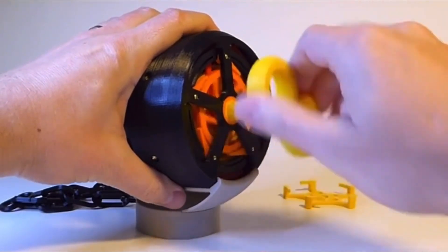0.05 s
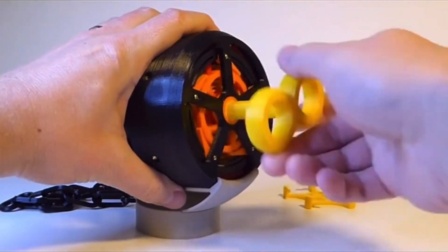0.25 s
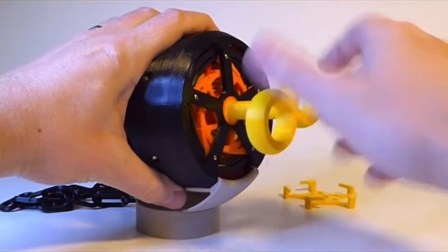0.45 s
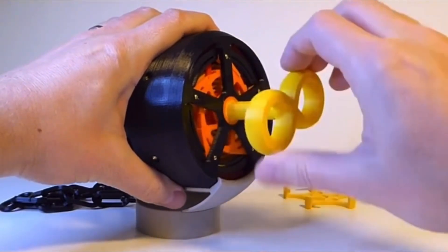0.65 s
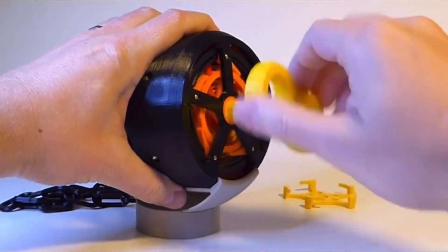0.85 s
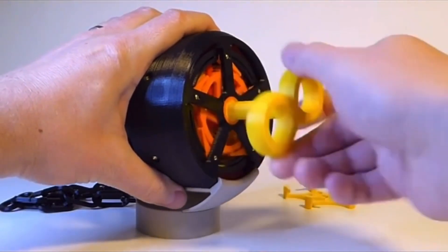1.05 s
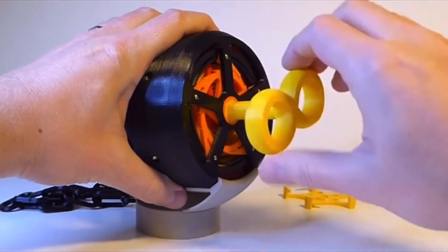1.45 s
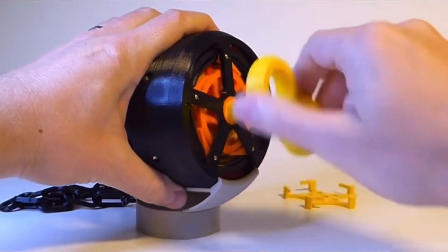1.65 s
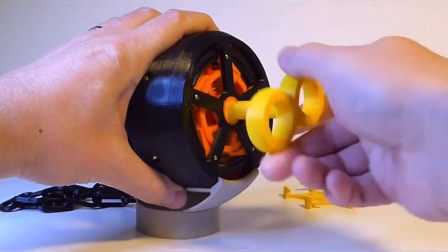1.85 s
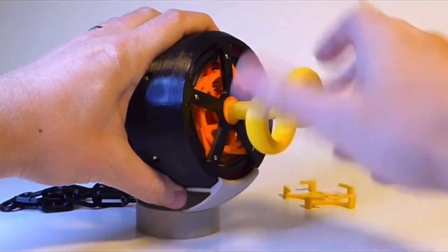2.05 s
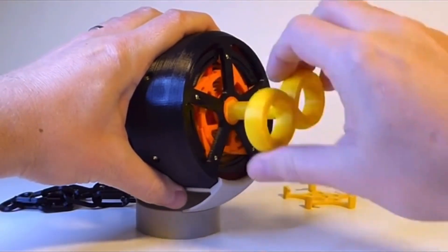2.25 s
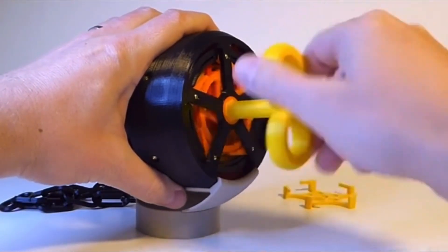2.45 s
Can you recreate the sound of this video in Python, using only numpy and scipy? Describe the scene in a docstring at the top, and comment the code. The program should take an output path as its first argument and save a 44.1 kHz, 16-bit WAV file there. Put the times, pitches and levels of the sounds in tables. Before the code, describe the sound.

Close ratchet clicking comes in three bursts as a big key winds a plastic ball. Each turn scrapes briefly, snaps and clatters. The loose key knocks between turns, over room echo and a faint low rumble.

```python
"""A plastic clockwork ball, wound by hand with a big key: three turns in a reverberant room.
On each turn the key rubs until its slack is taken up and catches with a loud snap; then the gears
tick and the pawl clatters over nine teeth, ringing the shell. Mostly between turns, the hand bumps
the toy and the loose key knocks in its socket. Room air and a low, swelling rumble lie underneath."""
import sys
import numpy as np
from scipy import signal
from scipy.fft import rfft, irfft, next_fast_len
from scipy.io import wavfile

SR = 44100
rng = np.random.default_rng(int(sys.argv[2]) if len(sys.argv) > 2 else 0)


def master_out(mix):
    """Clip the mix to full scale and print it as 16-bit PCM to the path in sys.argv[1]."""
    frames = np.transpose(np.atleast_2d(mix))
    ceiling = np.clip(frames, -1, 1)
    pcm = np.round(ceiling * 32767).astype(np.int16)
    wavfile.write(sys.argv[1], SR, pcm)


N = 110250


def from_db(db):
    return 10 ** (np.asarray(db) / 20)


def unit(x):
    """Scale to energy 1."""
    return x / np.sqrt(np.sum(x ** 2) + 1e-20)


def at_hz(points, hz):
    """Read a table on a log-frequency axis."""
    freqs, values = np.transpose(points)
    return np.interp(np.log(np.maximum(hz, 1)), np.log(freqs), values)


def colour(x, points):
    """Minimum-phase filter following (Hz, dB) points."""
    n = 2 * next_fast_len(x.shape[-1])
    gain = from_db(at_hz(points, np.fft.rfftfreq(n, 1 / SR)))
    cepstrum = irfft(np.log(gain))
    cepstrum[1:n // 2] *= 2
    cepstrum[n // 2 + 1:] = 0
    return irfft(rfft(x, n) * np.exp(rfft(cepstrum)))[..., :x.shape[-1]]


def resonate(force, hz, width_hz):
    """One resonance, peak gain 1."""
    r = np.exp(-np.pi * width_hz / SR)
    feedback = [1, -2 * r * np.cos(2 * np.pi * hz / SR), r * r]
    return signal.lfilter(np.array([1, 0, -1]) * (1 - r * r) / 2, feedback, force)


def add(out, start_s, sound):
    """Mix a sound in at start_s."""
    i = max(int(start_s * SR), 0)
    out[i:i + len(sound)] += sound[:max(len(out) - i, 0)]


def steady(spectrum):
    """Coloured noise, rms 1."""
    return np.sqrt(N) * unit(colour(rng.standard_normal(N + SR), spectrum)[SR:])


def grains(size, spread_db):
    """Dense micro-impacts of uneven strength."""
    return rng.standard_normal(size) * from_db(spread_db * np.minimum(rng.exponential(1, size), 4))


# Stereo width of the room. Each row: frequency in Hz, side against mid in dB.
SIDE_COLOUR = [(140, -13), (600, -4), (1100, -8), (2300, -19), (3800, -16), (5000, -5), (9000, -6)]

def side(sound):
    """Diffuse sound, opposite in sign left and right."""
    return colour(sound, SIDE_COLOUR) * np.array([[1], [-1]])


# Air spectrum. Each row: frequency in Hz, relative level in dB.
AIR_COLOUR = [(70, -22), (110, -8), (200, -9), (300, -3), (500, -3.5), (650, -14.5), (950, -2), (2000, -40),
              (11000, -24.5), (13500, -43)]

def room_air():
    """Steady, diffuse air noise."""
    return from_db(-49) * (steady(AIR_COLOUR) + side(steady(AIR_COLOUR)))


# Rumble spectrum. Each row: frequency in Hz, relative level in dB.
RUMBLE_COLOUR = [(95, -15), (133, 7.5), (153, 8), (185, -18.5), (300, -2.5), (1000, -65)]
# Rumble swells. Each row: start in seconds, end in seconds, level in dB.
RUMBLE_SWELLS = [(0.66, 0.817, -44), (1.43, 1.516, -49), (1.755, 1.764, -44), (2.236, 2.41, -49)]

def rumble(floor_db=-56.5, edge_s=0.028):
    """A low rumble that swells once the hand lets go."""
    t = np.arange(N) / SR
    swells = sum(from_db(db) * np.exp(-abs(t - np.clip(t, start_s, end_s)) / edge_s)
                 for start_s, end_s, db in RUMBLE_SWELLS)
    return np.hypot(from_db(floor_db), swells) * steady(RUMBLE_COLOUR)


# Hand on key and shell. Each row: start in seconds, thud level in dB, tap level in dB.
HAND_BUMPS = [(0.094, -49, -48.5), (.612, -42.5, -37), (1.411, -48, -39), (1.756, -43, -51),
              (2.208, -42.5, -40.5), (2.455, -49, -43)]
# Thud spectrum. Each row: frequency in Hz, relative level in dB.
THUD_COLOUR = [(40, -43), (140, 0), (220, 4.5), (480, 12), (700, -32)]

def hand_bumps(decay_s=0.022):
    """Soft, quickly damped thuds, each with a hollow tap of the shell."""
    out, t = np.zeros(N), np.arange(SR // 10) / SR
    for start_s, thud_db, tap_db in HAND_BUMPS:
        force = rng.standard_normal(len(t)) * np.exp(-t / decay_s)
        thud = from_db(thud_db) * unit(colour(force, THUD_COLOUR))
        tap = from_db(tap_db) * unit(resonate(force, hz=1035, width_hz=190))
        add(out, start_s, np.sqrt(decay_s * SR) * (thud + tap))
    return out


# Bare plastic contact. Each row: frequency in Hz, gain in dB.
CONTACT_COLOUR = [(100, -41), (450, -42.5), (650, -14), (1050, -3.5), (2000, -3.5), (5000, 9.5), (7500, 2),
                  (11000, 1.5), (12500, -5), (13700, -21)]
# Shell resonances. Each row: frequency in Hz, width in Hz, relative gain in dB.
SHELL_MODES = [(1010, 140, -20), (1370, 330, -0.5), (2122, 425, 5.5), (2976, 220, 3), (3760, 190, 3),
               (4950, 200, -16), (6940, 57, -11), (8810, 440, 4)]

def body(force, modes=SHELL_MODES, ring_db=-1):
    """A plastic contact plus the resonances it excites."""
    ringing = sum(from_db(db + ring_db) * resonate(force, hz, width_hz) for hz, width_hz, db in modes)
    return colour(force + ringing, CONTACT_COLOUR)


def stray_rings(force, count=4, low_hz=2800, high_hz=11500, q=48, gain_db=11):
    """Small parts ring across the treble, differently on each click."""
    pitches = low_hz * (high_hz / low_hz) ** ((np.arange(count) + rng.random(count)) / count)
    return from_db(gain_db) * sum(resonate(force, hz, hz / q) for hz in pitches)


def click_force(t, slide_s, rattle_s, snap_share=0.06, low_linger=1.91):
    """Low, mid and high band force: a slide, a snap at t = 0, a dying rattle whose lows linger."""
    impacts = grains(len(t), spread_db=2)
    envelopes = [np.exp(-abs(t) / np.where(t < 0, slide_s, rattle_s * linger))
                 for linger in (low_linger, 1, 1)]
    rattle = np.array([unit(envelope * impacts) for envelope in envelopes])
    return np.sqrt(1 - snap_share) * rattle + np.sqrt(snap_share) * (t == 0)


def clicks(rows, resonator=body, low_hz=2500, high_hz=6500, nominal_s=0.009):
    """Plastic clicks, each with its own ring and its own lows and highs against the mids."""
    out, lead = np.zeros(N), SR // 100
    t = (np.arange(SR // 15) - lead) / SR
    bands = [signal.butter(3, hz, kind, fs=SR, output="sos")
             for hz, kind in ((low_hz, "low"), ([low_hz, high_hz], "band"), (high_hz, "high"))]
    for snap_s, db, low_db, high_db, slide_s, rattle_s, ring_hz in rows:
        force = click_force(t, slide_s, rattle_s)
        own_ring = from_db(14) * resonate(force, ring_hz, width_hz=210)
        parts = resonator(force) + stray_rings(force) + own_ring
        click = sum(from_db(db + tilt_db) * unit(signal.sosfilt(band, part))
                    for band, part, tilt_db in zip(bands, parts, (low_db, 0, high_db)))
        add(out, snap_s - lead / SR, click * np.sqrt(nominal_s * SR))
    return out


# Key knocks. Each row: snap time in seconds, relative level in dB, lows in dB, highs in dB,
# slide in seconds, rattle in seconds, ring in Hz.
KEY_KNOCKS = [(0.1902, -38, -5, -13, 0.0012, 0.0022, 3600),
              (0.6118, -22.5, -10, -8.5, 0.0019, 0.0011, 3470),
              (1.0074, -30.5, -2, -29, 0.0012, 0.0038, 3840),
              (1.221, -23.0, -19, -8.5, 0.001, 0.0087, 3140.0),
              (1.4087, -29, -5.5, -22, 0.00039, 0.0072, 5100),
              (1.8078, -38.5, -7, -12, 0.00021, 0.0052, 3100),
              (2.2046, -30, -4.5, -11, 0.002, 0.0082, 3020)]

def key_knocks():
    """The loose key knocks in its socket and rings the shell."""
    return from_db(1.5) * clicks(KEY_KNOCKS)


# Friction force spectrum. Each row: frequency in Hz, relative level in dB.
FRICTION_COLOUR = [(3000, 16.5), (6000, 4.5), (12000, -3)]

def friction(length_s, db, slips_per_s, rise_db=0):
    """Tiny slips at random moments, heard through the shell."""
    t = np.arange(SR // 2) / SR
    slips = grains(len(t), spread_db=2.5) * (rng.random(len(t)) < slips_per_s / SR)
    envelope = (t < length_s) * from_db(rise_db * np.minimum(t / length_s, 1))
    force = colour(slips * envelope, FRICTION_COLOUR)
    return from_db(db) * np.sqrt(length_s * SR) * unit(body(force))


# Key rubs. Each row: start in seconds, end in seconds, level in dB.
KEY_RUBS = [(0.196, 0.265, -30), (1.013, 1.061, -31), (1.811, 1.85, -30)]

def key_rubs():
    """Gritty friction swells as the key takes up its slack."""
    out = np.zeros(N)
    for start_s, end_s, db in KEY_RUBS:
        add(out, start_s, friction(end_s - start_s, db, slips_per_s=4000, rise_db=15))
    return out


# Key catches. Each row: snap time in seconds, relative level in dB, lows in dB, highs in dB,
# slide in seconds, rattle in seconds, ring in Hz.
KEY_CATCHES = [(0.2525, -18, -10.5, -6, 0.0014, 0.0028, 3830.0),
               (1.0587, -17, -11.5, -6, 0.0014, 0.0022, 4760),
               (1.8581, -19, -9.5, -2.5, 0.0017, 0.002, 7760)]
# Key resonances. Each row: frequency in Hz, width in Hz, relative gain in dB.
KEY_MODES = [(1500, 46, 4.6), (2808, 20, 11), (3520, 320, 8.5), (4940, 100, 6.4), (10200, 300, 8.8)]

def key_catches():
    """The key catches and rings at the start of each turn."""
    return from_db(4.5) * clicks(KEY_CATCHES, lambda force: body(force, KEY_MODES, ring_db=-9.5))


def housing_thumps(corner_hz=440, low_cut_hz=220):
    """Each catch jolts the housing: one soft push that radiates little deep bass."""
    out, phase = np.zeros(N), 2 * np.pi * corner_hz * np.arange(SR // 50) / SR
    push = from_db(-27.5) * phase * np.exp(1 - phase)
    for start_s, *_ in KEY_CATCHES:
        add(out, start_s, push)
    return signal.sosfilt(signal.butter(1, low_cut_hz, "high", fs=SR, output="sos"), out + 1e-18)


def gear_ticks():
    """The gear train ticks faintly during each turn."""
    out = np.zeros(N)
    for start_s, *_ in KEY_CATCHES:
        add(out, start_s, friction(length_s=0.26, db=-36.5, slips_per_s=250))
    return out


# Pawl drops. Each row: snap time in seconds, relative level in dB, lows in dB, highs in dB,
# slide in seconds, rattle in seconds, ring in Hz.
PAWL_DROPS = [(0.2905, -19.5, -5.5, -5.5, 0.0016, 0.0055, 4830),
              (0.3214, -20.5, -9.5, -3.5, 0.0028, 0.0063, 4870),
              (0.3508, -21.5, -13.5, -6.5, 0.0069, 0.0048, 4700),
              (0.38, -24.5, -24, -3, 0.003, 0.0041, 5650), (0.4087, -22, -7, -7.5, 0.0024, 0.0077, 3080),
              (0.4352, -23.0, -9, -5, 0.0021, 0.0068, 4830),
              (0.4631, -21.0, -10, -9.5, 0.00033, 0.0067, 2960),
              (0.4934, -22.5, -6, -6.5, 0.0013, 0.0057, 7874),
              (0.5322, -19.5, -6, -11.5, 0.0024, 0.0028, 4360),
              (1.1062, -20.0, -7.0, -6, 0.0011, 0.0046, 5020),
              (1.1384, -24, -6, -5.5, 0.00026, 0.0046, 7500), (1.1697, -24, -6, -7, 0.0028, 0.0054, 6200),
              (1.2026, -21.0, -7, -7, 0.001, 0.005, 4550), (1.2295, -24, -12, -2, 0.00076, 0.0097, 5370),
              (1.2506, -21.5, -6, -5.5, 0.0021, 0.0063, 6530),
              (1.2776, -23, -11, -6.5, 0.0018, 0.003, 5100),
              (1.3085, -21, -6.5, -10.5, 0.00094, 0.00095, 4740), (1.348, -21, -8, -9, 0.0019, 0.007, 4420),
              (1.8925, -22.0, -7.5, -7.5, 0.00081, 0.0036, 8900),
              (1.9239, -22.0, -7.0, -5.5, 0.0079, 0.008, 7000),
              (1.9512, -22, -4.5, -7, 0.0016, 0.014, 8960), (1.9788, -22.5, -16, -8.5, 0.001, 0.0077, 2930),
              (2.0036, -22, -9.5, -4.5, 0.00062, 0.0059, 9280.0),
              (2.033, -22.5, -15.5, -9, 0.0042, 0.0062, 3000),
              (2.0595, -19.5, -10, -8.5, 0.0015, 0.0026, 2970),
              (2.0899, -24.5, -9.5, -3.5, 0.0011, 0.0042, 7860),
              (2.1359, -19, -7.5, -11, 0.0023, 0.0036, 3930)]

def pawl_clatter():
    """The pawl drops off tooth after tooth and rings the shell."""
    return from_db(2.5) * clicks(PAWL_DROPS)


# Early reflection spectrum. Each row: frequency in Hz, gain in dB.
EARLY_COLOUR = [(200, -12), (1000, -2), (1800, -1), (3500, -8), (6000, -17), (12000, -22)]
# Tail spectrum. Each row: frequency in Hz, gain in dB.
TAIL_COLOUR = [(60, -11), (140, 15.5), (400, -8), (700, -7.5), (1500, 2), (3000, -6), (5000, -9),
               (9000, -10.5), (13500, -19)]
# Tail decay. Each row: frequency in Hz, T60 in seconds.
TAIL_T60 = [(2000, 1.44), (4000, 1.44), (8000, 0.74)]

def room_response(early_delay_s=0.003127, early_decay_s=0.0016, wall_delay_s=0.011, build_s=0.024):
    """Early reflections off table and hands, then a long tail whose treble dies first."""
    t = np.arange(N) / SR
    hz, centres = np.fft.rfftfreq(N, 1 / SR), np.geomspace(100, 14000, 10)
    build_up = 1 - np.exp(-np.maximum(t - wall_delay_s, 0) / build_s)
    noise, tail = rfft(rng.standard_normal(N)), np.zeros(N)
    for centre, weights in zip(centres, np.eye(len(centres))):
        band = irfft(noise * at_hz(np.c_[centres, weights], hz), N)
        decay = from_db(-60 * t / at_hz(TAIL_T60, centre))
        tail += band * unit(decay * build_up)
    early = rng.standard_normal(N) * unit(np.exp(-t / early_decay_s) * (t > early_delay_s))
    return colour(tail, TAIL_COLOUR) + colour(early, EARLY_COLOUR)


def reverberate(sound, earlier_s=0.89, earlier_db=2.5):
    """A fresh diffuse echo field; a turn made earlier_s before the first still rings in it."""
    room, gap = room_response(), int(earlier_s * SR)
    first_turn = sound * (np.arange(N) < gap)
    earlier_tail = signal.fftconvolve(first_turn, room)[gap:gap + N]
    return signal.fftconvolve(sound, room)[:N] + from_db(earlier_db) * earlier_tail


def scene():
    """The toy close and centred, its reverberation spread around it, over air and rumble."""
    toy = key_knocks() + key_rubs() + key_catches() + gear_ticks() + pawl_clatter()
    hand = hand_bumps()
    radiated = toy + from_db(-9.5) * hand
    echoes = reverberate(radiated) + side(reverberate(radiated))
    return toy + hand + housing_thumps() + echoes + room_air() + rumble()


def record(dry, clip_level=0.95, cutoff_hz=13900):
    """Peak clipping, then a steep low-pass."""
    low_pass = signal.ellip(10, 0.3, 80, cutoff_hz, fs=SR, output="sos")
    return signal.sosfilt(low_pass, np.clip(dry, -clip_level, clip_level))


dry = scene()
out = record(dry)
master_out(out)
```